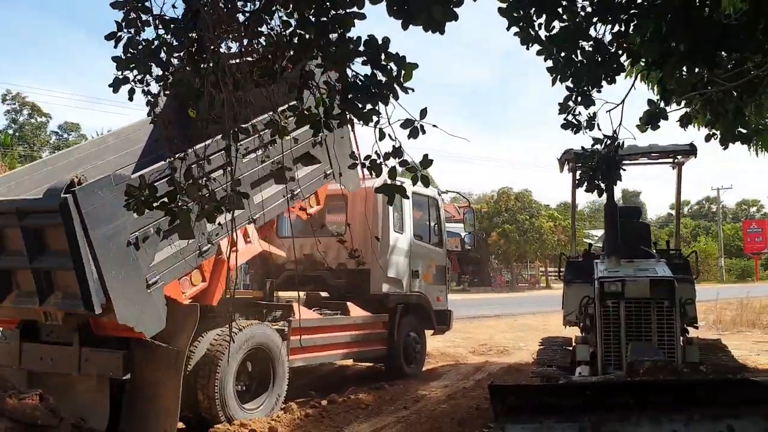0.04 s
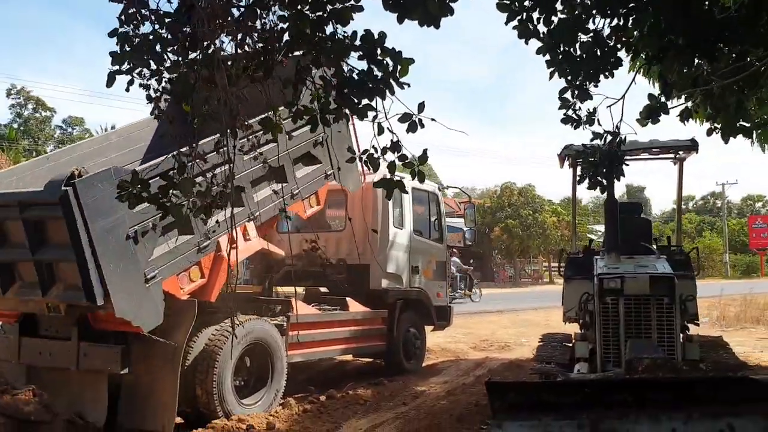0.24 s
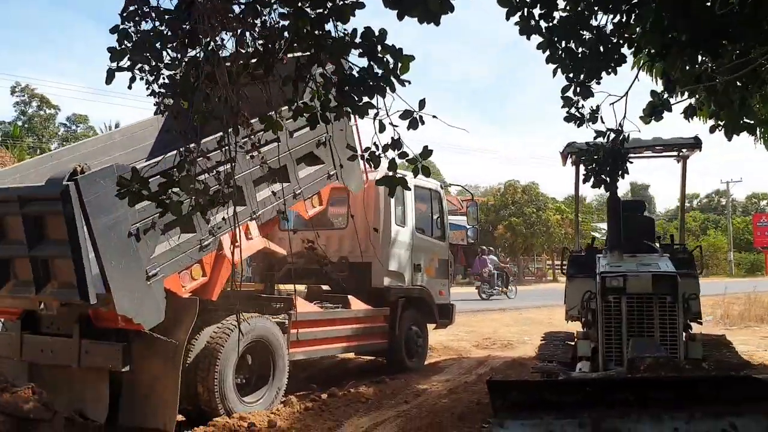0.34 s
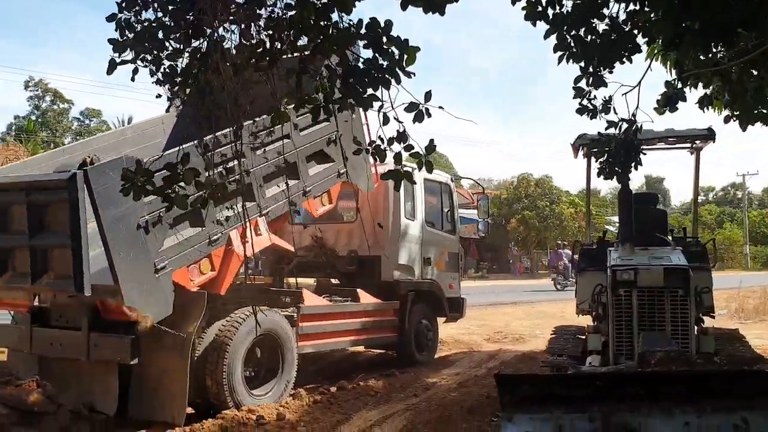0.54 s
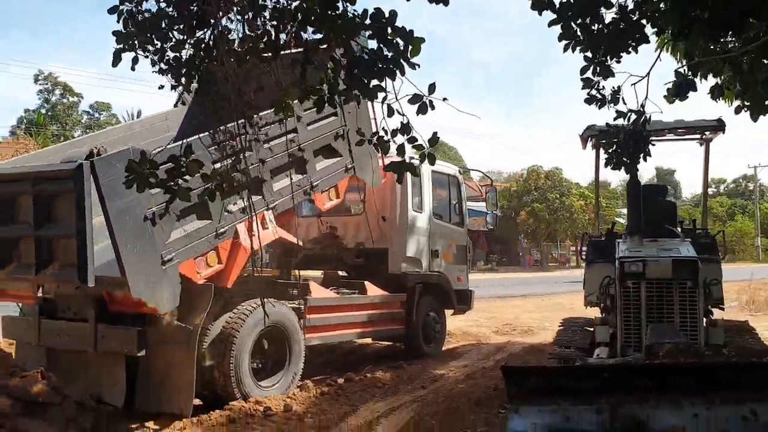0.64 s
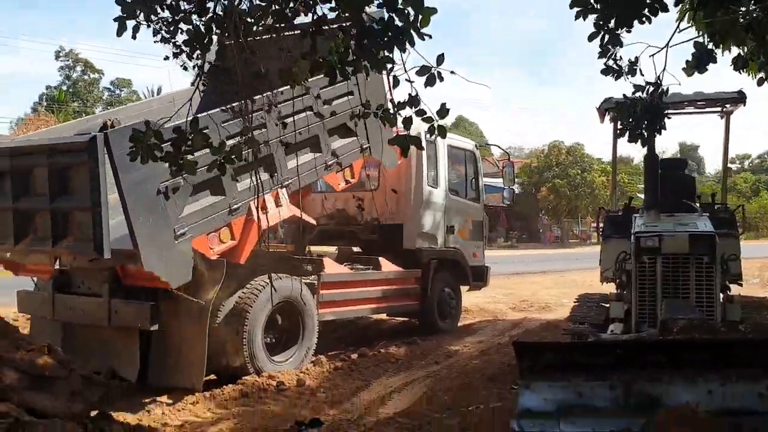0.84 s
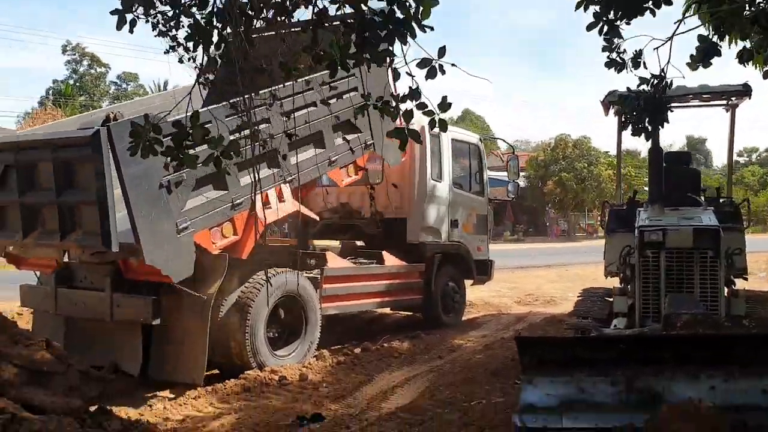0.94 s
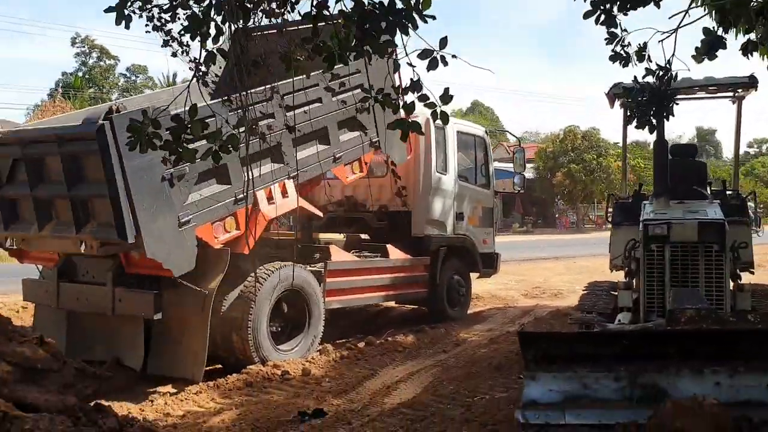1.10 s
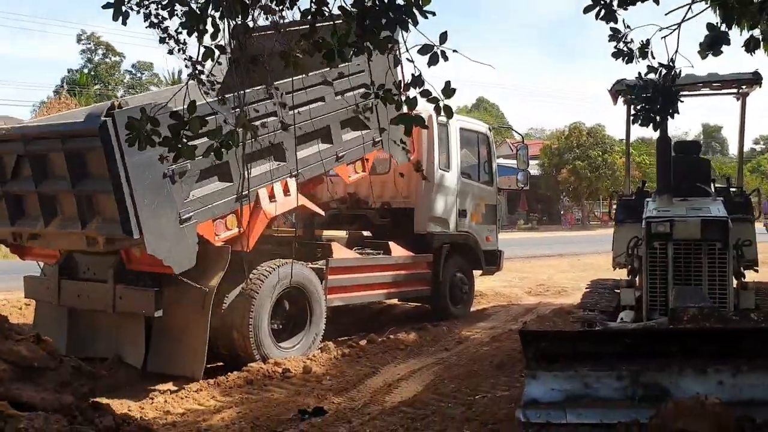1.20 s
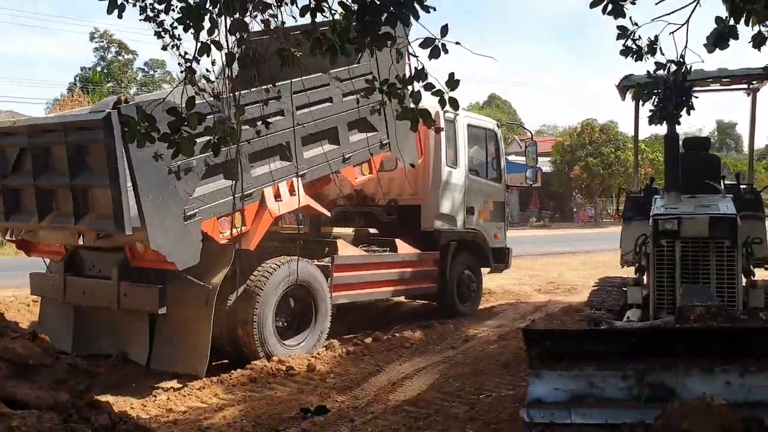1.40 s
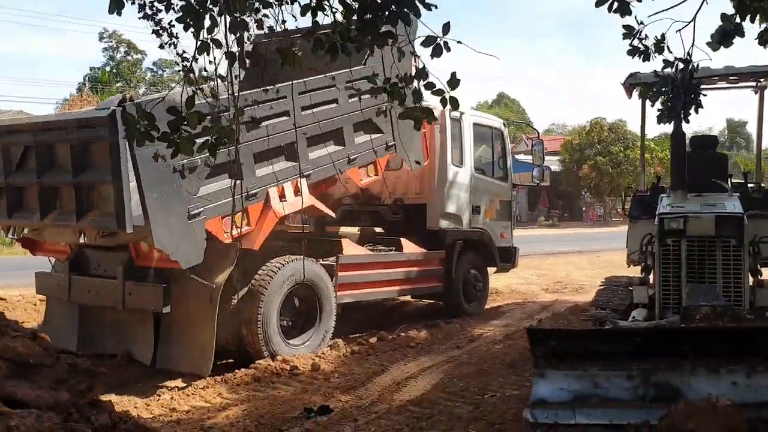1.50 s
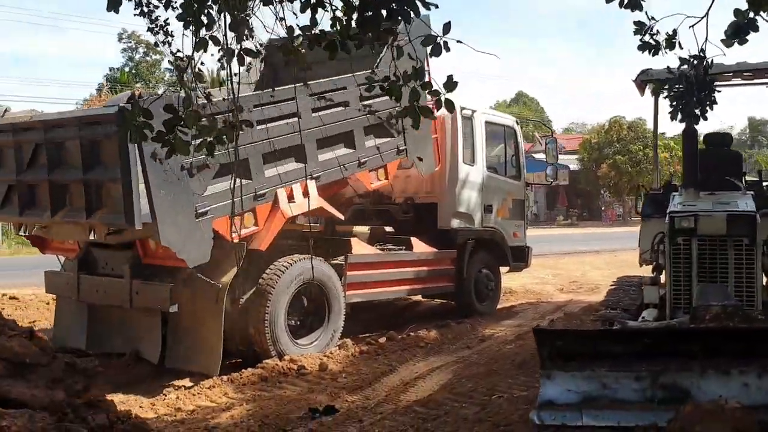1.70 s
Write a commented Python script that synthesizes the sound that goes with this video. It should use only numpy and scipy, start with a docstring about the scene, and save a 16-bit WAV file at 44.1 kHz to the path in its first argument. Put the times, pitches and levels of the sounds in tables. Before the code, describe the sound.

A dump truck's steel tailgate slams loudly at about 0.2 seconds, clattering briefly, with a dull rebound knock at 0.4 as the hollow bed booms and fades. A second slam comes at 1.3 seconds, with another knock near 1.55. A low engine idles throughout outdoors, with faint hissing soil and soft wind bumps on the microphone. A tiny squeak sounds at 0.9, and a faint thin whistle from 1.5.

```python
"""Outdoors beside a tipper truck, on a stereo microphone. The steel tailgate swings against the bed twice;
each slam chatters and clanks briefly, the hollow steel body booms on, and the gate rebounds with dull knocks.
Behind it the engine idles, loose soil hisses off the bed and wind bumps the microphone.
A faint squeak falls between the slams, and a thin whistle comes in at the end."""
import sys
import numpy as np
from scipy import signal
from scipy.fft import rfft, irfft
from scipy.io import wavfile
from scipy.ndimage import uniform_filter1d

SR = 44100
rng = np.random.default_rng(int(sys.argv[2]) if len(sys.argv) > 2 else 0)


def wav_record(signal):
    """Record a signal, one row per channel, as 16-bit PCM in the file named by sys.argv[1]."""
    frames = np.transpose(np.atleast_2d(signal))
    bounded = np.clip(frames, -1, 1)
    # unit amplitude maps onto the largest positive 16-bit level
    quanta = np.round(bounded * 32767).astype(np.int16)
    wavfile.write(sys.argv[1], SR, quanta)


N = 77175

# Stereo image of the steel: (frequency [Hz], left-right likeness [0..1])
STEEL_LIKENESS = [(60, 0.72), (500, 0.95), (1200, 0.74), (2500, 0.24), (4500, 0.75), (8000, 0.32),
                  (12000, 0.13)]
# Wider image of the engine and soil: (frequency [Hz], left-right likeness [0..1])
BACKGROUND_LIKENESS = [(40, 0.28), (300, 0.59), (1000, 0.46), (4000, 0.1), (12000, 0.067)]


def amp(db):
    return 10 ** (np.asarray(db) / 20)


def unit_rms(x):
    return x / np.sqrt(np.mean(x ** 2) + 1e-20)


def curve_at(points, hz):
    """Value of a (frequency, value) curve, interpolated over log frequency."""
    f, value = np.transpose(points)
    return np.interp(np.log(hz + 1), np.log(f + 1), value)


def noise(colour, likeness, patchy_db, size=1024):
    """Stereo noise at unit RMS, from random short-time spectra with drifting louder patches."""
    hop = size // 4
    frames, hz = N // hop + 5, np.fft.rfftfreq(size, 1 / SR)
    a, b, c, d, patches = rng.standard_normal((frames, len(hz), 5)).T
    patches = unit_rms(uniform_filter1d(uniform_filter1d(patches, size=9, axis=0), size=9, axis=1))
    like = np.clip(curve_at(likeness, hz), -1, 1)[:, None]
    left = a + 1j * b
    right = like * left + np.sqrt(1 - like ** 2) * (c + 1j * d)
    spectra = np.array([left, right]) * amp(curve_at(colour, hz)[:, None] + patchy_db * patches)
    return unit_rms(signal.istft(spectra, nperseg=size, noverlap=size - hop)[1][:, :N])


def engine():
    """Idle rumble in the background, throbbing with the slightly uneven firing."""
    # Idle spectrum: (frequency [Hz], relative density [dB])
    colour = [(18, -27), (30, -2), (75, 4), (364, -8), (1010, -10), (1460, -18.5), (2610, -20),
              (3060, -24.5), (13000, -36), (14800, -67), (16000, -65)]
    firing_hz, level_db, throb_db = 22.28, -42, 1.5
    t = np.arange(N) / SR
    speed_drift = 0.0084 * unit_rms(uniform_filter1d(rng.standard_normal(N), size=3000))
    throb = np.cos(2 * np.pi * firing_hz * (t + np.cumsum(speed_drift) / SR))
    return amp(level_db + throb_db * throb) * noise(colour, BACKGROUND_LIKENESS, patchy_db=1)


def soil():
    """Fine hiss of soil sliding off the bed, strongest around the slams."""
    # Hiss spectrum: (frequency [Hz], relative density [dB])
    colour = [(1470, -12), (2500, -3.5), (3630, -3), (4550, -10), (6550, -9), (9010, -14.5), (13700, -8),
              (16000, -24)]
    # Flow of the soil: (time [s], relative level [dB])
    flow = [(0, -48), (.03, -48), (.11, -53.5), (.21, -53), (.5, -62), (.9, -73), (1.16, -65), (1.205, -57),
            (1.25, -55.5), (1.45, -50.5), (1.6, -51), (1.75, -51)]
    flow_db = np.interp(np.arange(N) / SR, *np.transpose(flow))
    return amp(4.5 + flow_db) * noise(colour, BACKGROUND_LIKENESS, patchy_db=2, size=256)


def blip(peak_s, db, width_s, hz):
    """A soft, bell-shaped swell of one pitch."""
    t = np.arange(N) / SR - peak_s
    return amp(db) * np.exp(-.5 * (t / width_s) ** 2) * np.sin(2 * np.pi * hz * t + 1.95)


def wind():
    """Wind bumps the microphone with low thumps, harder on the left."""
    # Bumps: (time [s], level [dB], width [s], frequency [Hz])
    bumps = [(0.138, -32.5, 0.016, 74), (.168, -27, 0.008, 81.6), (0.782, -41.5, 0.059, 80),
             (0.949, -28.5, 0.0036, 97), (1.197, -40, 0.0044, 90)]
    return sum(blip(*row) for row in bumps) * amp([[1.5], [-1.5]])


def whistle():
    """A faint hissy whistle: a narrow band of noise fades in after the second slam."""
    centre_hz, half_width_hz, level_db, start_s = 3600, 125, -59, 1.48
    band = signal.butter(2, [centre_hz - half_width_hz, centre_hz + half_width_hz], "band", fs=SR)
    fade = np.clip((np.arange(N) / SR - start_s) / .05, 0, 1)
    return amp(level_db) * fade * unit_rms(signal.lfilter(*band, rng.standard_normal((2, N))))


def rebounds():
    """The gate rebounds softly; each knock is a short damped thud of two panel modes."""
    # Knocks: (time [s], level [dB])
    knocks = [(.376, -10), (.759, -36), (1.432, -33), (1.5533, -16.5)]
    low_hz, high_hz, rise_s, t60 = 338, 538, 0.0012, 0.039
    t, drive = np.arange(2000) / SR, np.zeros(N)
    for start, db in knocks:
        drive[round(start * SR)] = amp(db)
    envelope = (1 - np.exp(-t / rise_s)) * amp(-60 * t / t60)
    modes = np.sin(2 * np.pi * low_hz * t) + .6 * np.sin(2 * np.pi * high_hz * t)
    return signal.fftconvolve(drive, envelope * modes)[:N]


def clanks():
    """Bright single clanks within the clatter, each ringing a cluster of close high modes."""
    # Clanks: (time [s], level [dB], cluster centre [Hz])
    hits = [(.2325, -19, 5820), (.251, -20, 5240), (.262, -18.5, 4130), (.308, -25, 5200),
            (1.278, -21, 5070), (1.322, -22, 4350), (1.352, -23, 4670)]
    modes, t60, samples = 9, 0.043, 3000
    t, out = np.arange(samples) / SR, np.zeros((2, N + samples))
    for start, db, centre in hits:
        hz = centre * (1 + .13 * rng.standard_normal((modes, 1)))
        ring = np.sin(2 * np.pi * (hz * t + rng.random((2, modes, 1)))).sum(1) / np.sqrt(modes)
        at = round(start * SR)
        out[:, at:at + samples] += ring * amp(db - 60 * t / t60)
    return out[:, :N]


def bed_ring():
    """The steel bed after one tap: clear modes over dense ones that build up and die band by band."""
    # Clear modes of the bed: (frequency [Hz], relative level [dB], t60 [s])
    body_modes = [(80, -19, 0.96), (109.14, -2, 0.52), (153.6, -16.5, 1.2), (228, 0.5, 0.18),
                  (254.8, -5, 0.575), (298.1, -7, 1.09), (336.2, -16, 1.56), (363, -0.5, 0.33),
                  (378, -6.5, 0.98), (426.4, -11.5, 1.28), (447.4, -15.5, 1.5), (463, -11.5, 1.41),
                  (496, -9, 0.46), (546.7, -6.5, 0.62), (585, -1.5, 0.32), (599, -10.5, 0.69),
                  (675.5, -10.5, 0.66), (716, -15, 1.51), (810, -30, 1.88), (908, -34, 0.46),
                  (1011, -25, 0.27), (1010, -9.5, 0.4), (1132, -7.5, 0.49), (1170, -25, 0.17),
                  (1388, -15, 0.72)]
    # Dense modes of the panels: (frequency [Hz], relative density [dB])
    panel_colour = [(24, -52), (40, -15.5), (96, -3.5), (262, -11.5), (305, -3), (433, -7.5), (556, -3),
                    (770, -13), (1020, -10.5), (11000, -39), (14800, -53), (16000, -92)]
    # Decay of the panels: (frequency [Hz], t60 [s])
    panel_t60 = [(60, 0.76), (150, 0.68), (330, 1.06), (700, 0.85), (1400, 0.62), (3000, 0.58),
                 (6000, 0.43), (12000, .12)]
    # Build-up of the ring: (frequency [Hz], time constant [s])
    rise = [(60, 0.02), (120, 0.018), (250, 0.001), (700, 0.006), (1500, 0.021), (3500, 0.023),
            (6000, 0.0018)]
    t, hz = np.arange(N) / SR, np.fft.rfftfreq(N, 1 / SR)
    spectrum = rfft(noise(panel_colour, STEEL_LIKENESS, patchy_db=1.5, size=2048))
    centres = np.geomspace(45, 16000, 18)
    dense = np.zeros((2, N))
    for k, centre in enumerate(centres):
        band = np.interp(np.log(hz + 1), np.log(centres), np.arange(len(centres)) == k)
        build_up = 1 - np.exp(-t / curve_at(rise, centre))
        dense += irfft(spectrum * band, N) * build_up * amp(-60 * t / curve_at(panel_t60, centre))
    phase = 2 * np.pi * rng.random((len(body_modes), 1))
    mode_hz, db, t60 = np.transpose(body_modes)[:, :, None]
    build_up = 1 - np.exp(-t / curve_at(rise, mode_hz))
    clear = amp(db - 60 * t / t60) * build_up * np.sin(2 * np.pi * mode_hz * t + phase)
    return dense + amp(-4) * clear.sum(0)


def slam(start, blow_db, low_db, bright_db, plateau_s, tilt_db):
    """One blow rings the bed; the crash stays nearly level, as if held by a limiter, then drops away."""
    # Bright part of the crash: (frequency [Hz], relative density [dB])
    tick_colour = [(700, -11), (1500, -2), (2500, 3.5), (4000, -0.5), (5800, -5), (8000, -12),
                   (12000, -15.5), (15000, -25)]
    taps_per_s, spread_db, crash_t60, tick_t60 = 1200, 5.5, 0.18, 0.12
    t = np.arange(N) / SR - start
    taps = (rng.random(N) < taps_per_s / SR) * rng.choice([-1., 1.], N)
    taps = unit_rms(taps * amp(spread_db * np.minimum(rng.exponential(1, N), 4)))
    envelope_db = tilt_db * np.clip(t / plateau_s, 0, 1) - 60 * np.maximum(t - plateau_s, 0) / crash_t60
    taps *= (t > 0) * amp(envelope_db)
    drive = taps * amp(low_db) / np.sqrt(SR * plateau_s)
    drive[round(start * SR)] += amp(blow_db)
    tick = noise(tick_colour, STEEL_LIKENESS, patchy_db=3)[:, 2000:6000]
    tick *= amp(-60 * np.arange(4000) / SR / tick_t60)
    tick *= amp(bright_db) / np.linalg.norm(tick[0])
    crash = signal.fftconvolve(taps[None], tick, axes=1)[:, :N]
    boom = signal.fftconvolve(drive[None], bed_ring(), axes=1)[:, :N]
    return crash + boom


def tailgate():
    """The gate strikes the bed; the microphone gets it a little earlier and softer on the left."""
    # Slams: (time [s], blow [dB], low crash [dB], bright crash [dB], level plateau [s], its tilt [dB])
    slams = [(0.2302, -7.5, -14, -22.5, 0.13, -4), (1.261, -12, -13.5, -28, 0.096, 2)]
    right_lag_s, left_db = 0.00017, -1
    gate = sum(slam(*row) for row in slams) + rebounds() + clanks()
    hz = np.fft.rfftfreq(N, 1 / SR)
    gate[1] = irfft(rfft(gate[1]) * np.exp(-2j * np.pi * hz * right_lag_s), N)
    return gate * amp([[left_db], [0]])


def scene():
    """At the microphone: the tailgate up front, everything else well below it."""
    squeak = blip(peak_s=.9, db=-57, width_s=.025, hz=1655)
    return tailgate() + engine() + soil() + wind() + squeak + whistle()


def record(dry):
    """Microphone chain: low cut, soft overload, then the band limit."""
    low_cut_hz, edge_hz = 20.7, 16400
    low_cut = signal.butter(2, low_cut_hz, "high", fs=SR)
    overloaded = np.tanh(signal.lfilter(*low_cut, dry))
    band_limit = signal.firwin(511, edge_hz, window=("kaiser", 9), fs=SR)
    return signal.oaconvolve(overloaded, band_limit[None], "same")


dry = scene()
out = record(dry)
wav_record(out)
```